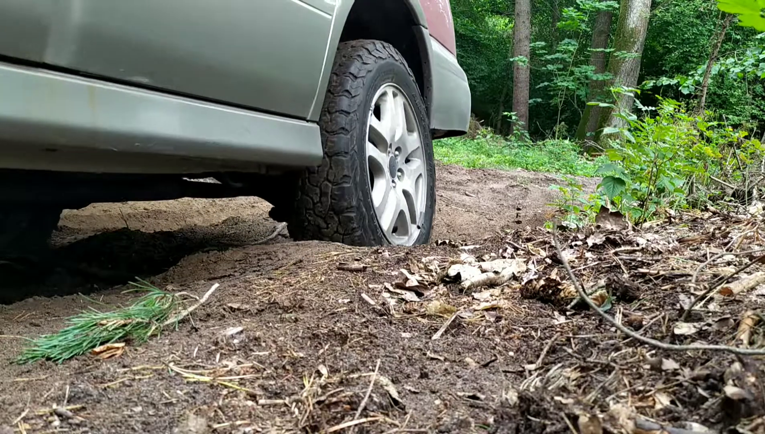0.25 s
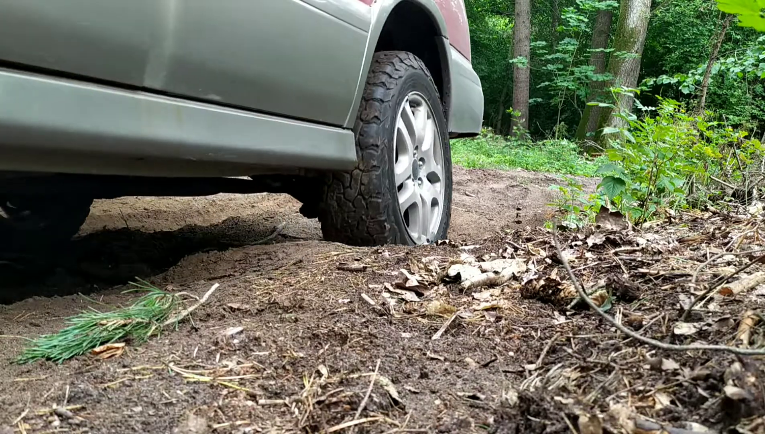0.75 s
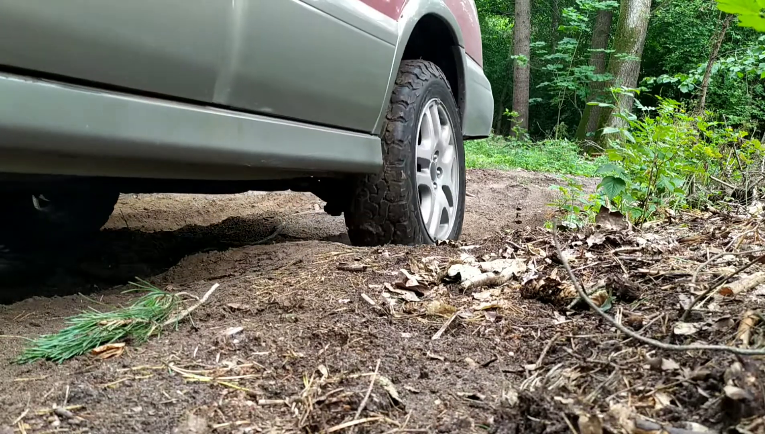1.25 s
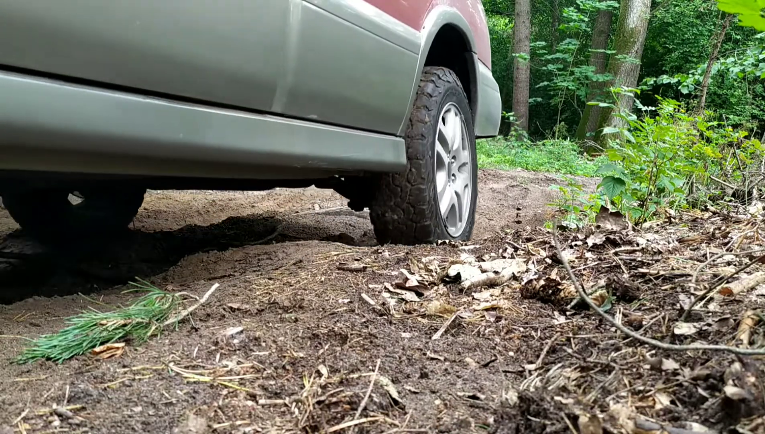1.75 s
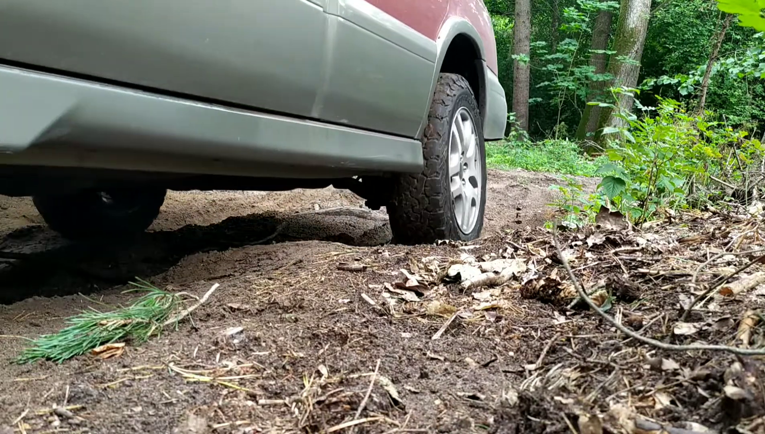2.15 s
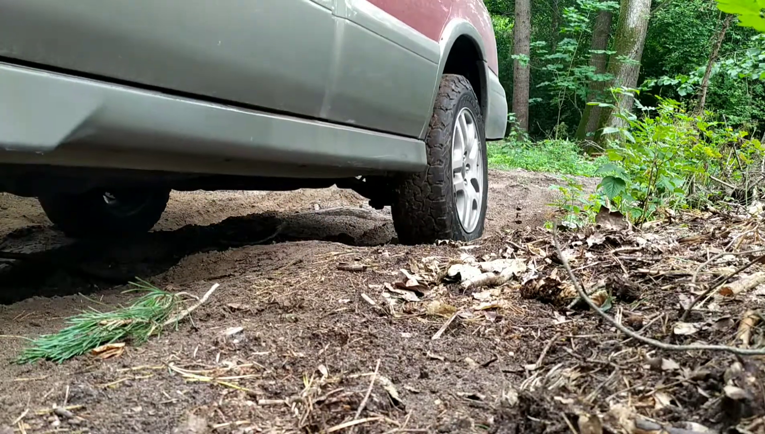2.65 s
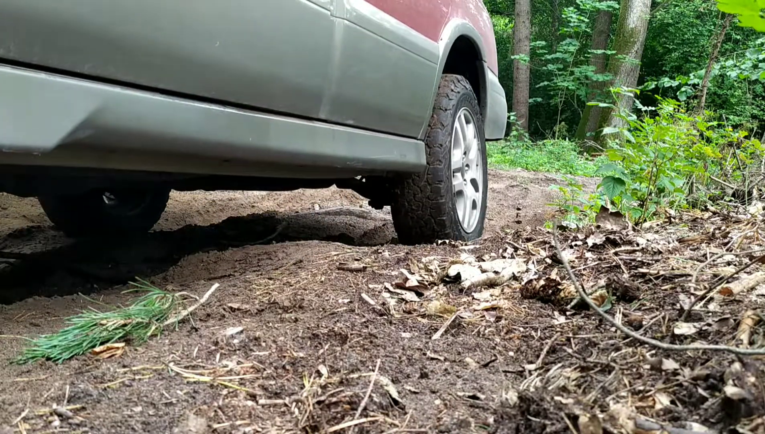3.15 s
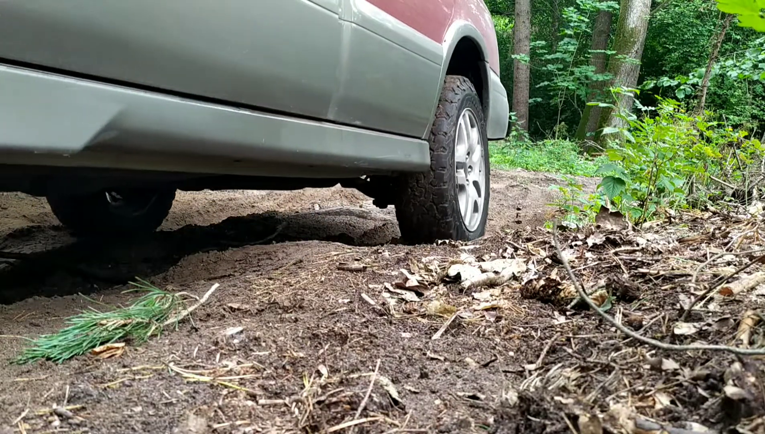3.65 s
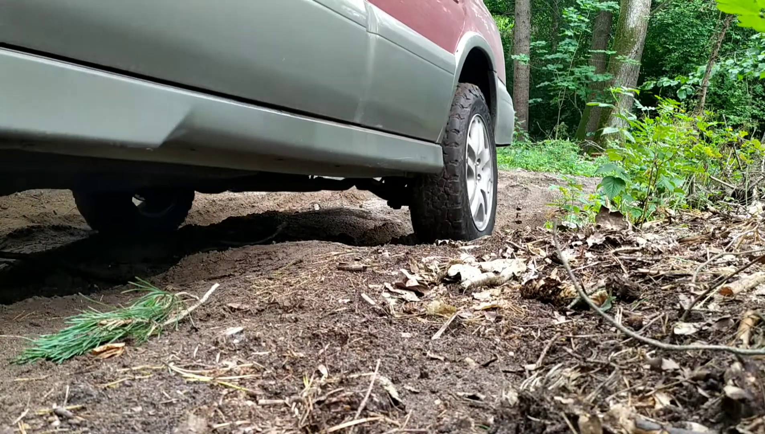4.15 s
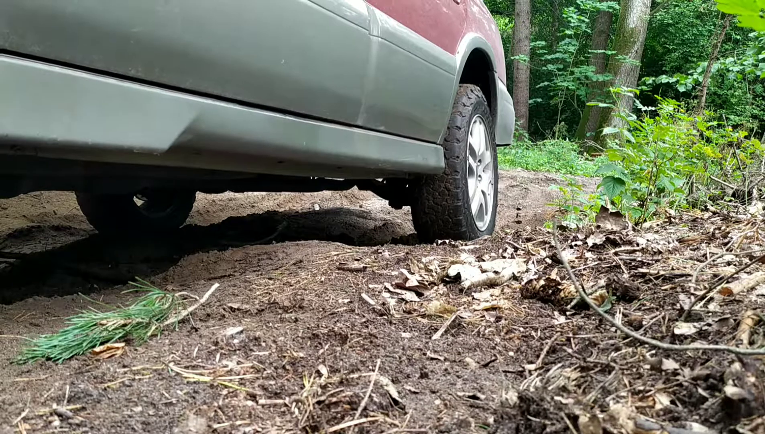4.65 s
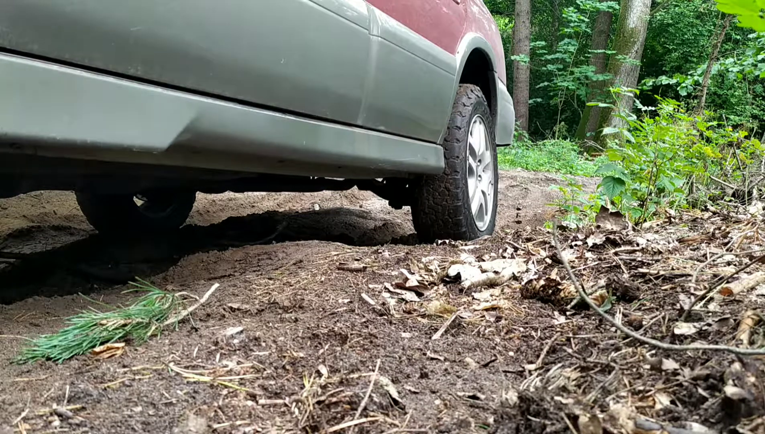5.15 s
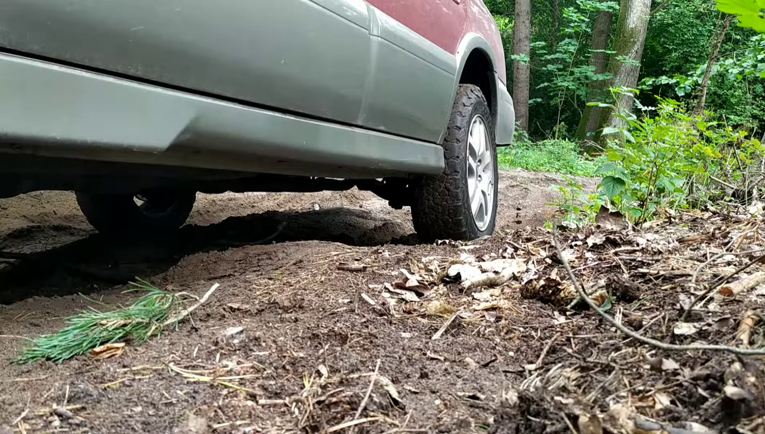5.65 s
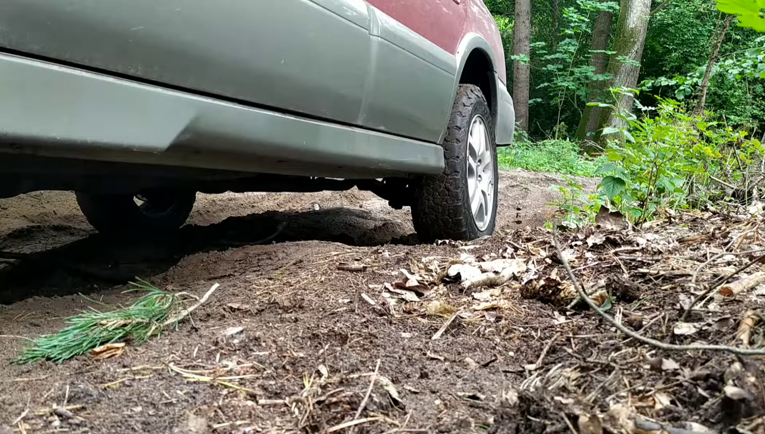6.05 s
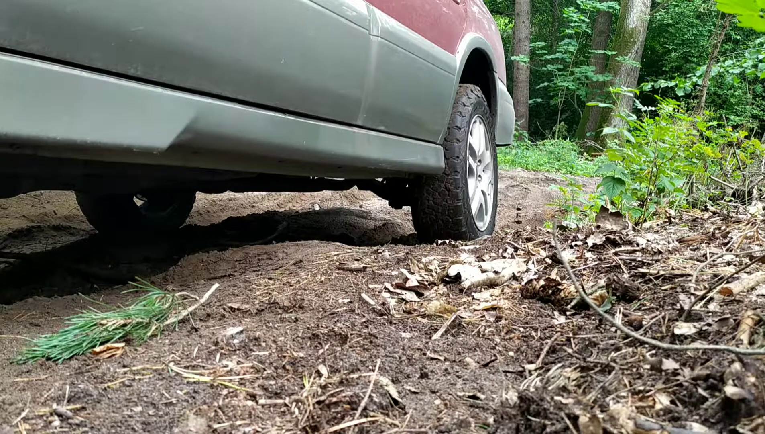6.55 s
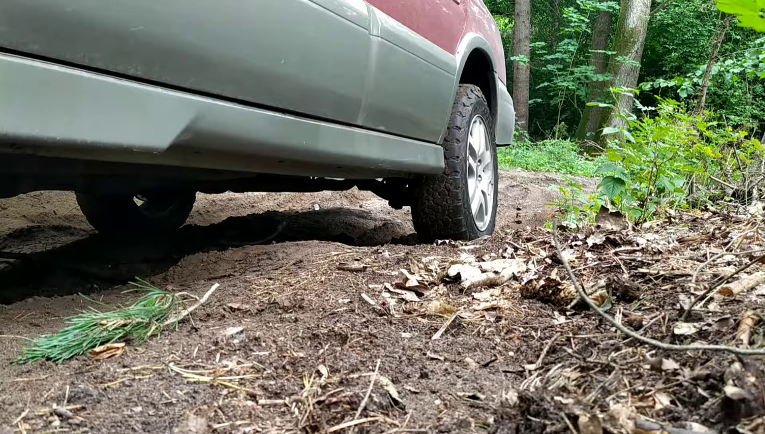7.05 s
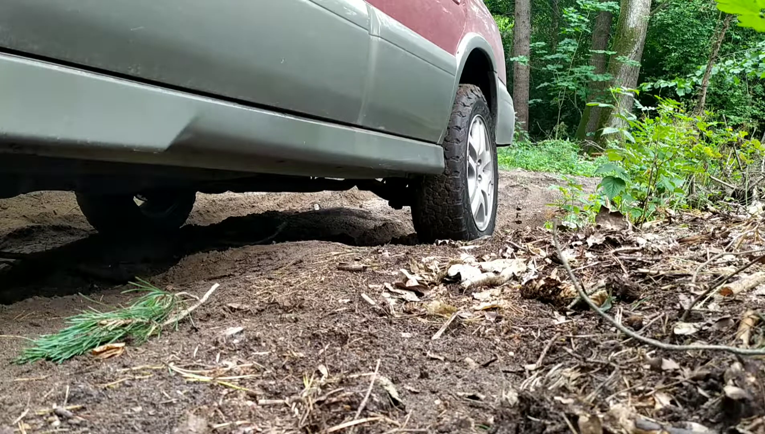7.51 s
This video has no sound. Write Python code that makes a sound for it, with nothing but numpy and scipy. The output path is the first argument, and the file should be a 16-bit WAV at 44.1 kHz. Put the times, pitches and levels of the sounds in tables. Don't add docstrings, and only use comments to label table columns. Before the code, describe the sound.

Low, boomy car engine labouring at ground level, sinking to a lumpy chug then picking up, with ticking valves and cracking twigs under tyres.

```python
import sys
import numpy as np
from scipy import signal
from scipy.fft import rfft, irfft, next_fast_len
from scipy.io import wavfile
from scipy.ndimage import uniform_filter1d, map_coordinates

SR = 44100
rng = np.random.default_rng(int(sys.argv[2]) if len(sys.argv) > 2 else 0)


def store_wav(level_fs):
    pcm = np.round(np.clip(np.atleast_2d(level_fs), -1, 1) * 32767)
    wavfile.write(sys.argv[1], SR, pcm.T.astype(np.int16))


def ratio_of_db(decibels):
    return 10 ** (np.asarray(decibels, float) / 20)


N = 343098


def unit(x):
    return x / np.sqrt(np.mean(x ** 2) + 1e-20)


def along(points, hz):
    f, v = np.transpose(points)
    return np.interp(np.log(hz + 1), np.log(f + 1), v)


def curves(rows):
    s, *cols = np.transpose(rows)
    return [np.interp(np.arange(N) / SR, s, c) for c in cols]


def wobble(rate_hz):
    coarse = np.arange(0, N + 64, 64)
    knots = rng.standard_normal(int(N * rate_hz / SR) + 4)
    return np.interp(np.arange(N), coarse, map_coordinates(knots, [coarse * rate_hz / SR]))


def filtered(x, response):
    m = next_fast_len(N + SR)
    return irfft(rfft(x, m) * response(np.fft.rfftfreq(m, 1 / SR) + 1e-3), m)[..., :N]


def mode(f, centre_hz, width_hz):
    return 1j * f * width_hz / (centre_hz ** 2 - f ** 2 + 1j * f * width_hz)


def strikes(times_s, sizes):
    at = np.round(times_s * SR).astype(int)
    keep = (at >= 0) & (at < N)
    return np.bincount(at[keep], (sizes + 0 * times_s)[keep], N)


# hz, correlation
LIKENESS = [(60, 1), (250, 0.95), (500, 0.98), (1000, 0.82), (1600, 0.73), (2200, 0.55), (3200, 0.56),
            (5000, 0.45), (8000, 0.1), (12000, 0.15)]


def rush(spectrum, patchy_db):
    z = signal.stft(rng.standard_normal((2, N)), nperseg=512)[2]
    field = uniform_filter1d(rng.standard_normal(z.shape[1:]), size=6, axis=0)
    field = uniform_filter1d(field, size=12, axis=1)
    pair = signal.istft(z * ratio_of_db(patchy_db * unit(field)), nperseg=512)[1][:, :N]

    def mid_side(hz):
        angle = np.arccos(np.clip(along(LIKENESS, hz), -1, 1)) / 2
        return ratio_of_db(along(spectrum, hz)) * [np.cos(angle), np.sin(angle)]

    mid, side = filtered(pair, mid_side)
    return unit(np.array([mid + side, mid - side]))


# hz, level_db
AIRFLOW = [(45, -60), (65, -3), (135, -5), (210, -3.5), (260, -11.5), (400, -8), (550, -11), (750, -19),
           (1100, -18), (1600, -43), (4000, -90)]
WHIRR = [(500, -46), (1000, -3.5), (1400, -5.5), (2100, -1.5), (2800, -4.5), (3600, -6), (4500, -13),
         (7000, -67)]
HISS = [(2000, -49), (4000, -3), (5500, -0.5), (7000, -1.5), (9000, 0.5), (11000, -2), (13000, -4.5),
        (15500, -5.5), (17000, -30)]


def engine_bay():
    PULL_S, PULL_RISE_S = 3.19, .08
    pull = .5 + .5 * np.tanh((np.arange(N) / SR - PULL_S) / PULL_RISE_S)
    air_db = -45.5 + 2 * pull + 4.0 + 1.14 * wobble(11)
    whirr_db = -56.5 + 2.5 * pull + 4 + 0.61 * wobble(15)
    hiss_db = -55 + 1.64 * pull + 3.5 + 0.21 * wobble(7.9)
    air = ratio_of_db(air_db) * rush(AIRFLOW, patchy_db=1.5)
    whirr = ratio_of_db(whirr_db) * rush(WHIRR, patchy_db=1.5)
    hiss = ratio_of_db(hiss_db) * rush(HISS, patchy_db=2.0)
    return air + whirr + hiss


# time_s, turns_per_s
FAN_SPEED = [(0, 37.9), (1, 37.9), (2, 37.7), (2.35, 37.15), (3.1, 37.2), (3.6, 37.8), (5.5, 37.8),
             (7.78, 37.85)]
# multiple_of_fan_speed, level_db
BLADE_HUM = [(4, -42), (5, -48), (6, -55), (8, -55.5), (9, -60.5), (10, -56.5), (12, -57), (14, -60.5),
             (15, -58.5), (18, -59.5)]


def fan():
    turn_rad = 2 * np.pi * np.cumsum(curves(FAN_SPEED)[0]) / SR

    def hum(k, db):
        level = ratio_of_db(db + 3 + wobble(4))
        return level * np.sin(k * turn_rad + .15 * wobble(3) + 2 * np.pi * rng.random())

    return sum(hum(round(k), db) for k, db in BLADE_HUM)


# time_s, speed_rpm
REVS = [(0, 785.4), (.6, 775.2), (1.2, 743.7), (1.5, 659.9), (1.9, 611.7), (2.95, 614.1), (3.15, 683.7),
        (3.4, 798.6), (3.9, 796.9), (4.6, 806), (5.6, 779.2), (6.7, 771.5), (7.1, 741), (7.78, 644.6)]


def crank():
    START_CYCLE = -.202
    t = np.arange(-200, 8000) / 1000
    done = np.cumsum(np.interp(t, *np.transpose(REVS))) / 120 / 1000
    return t, done - np.interp(0, t, done) + START_CYCLE


def moments(share):
    t, done = crank()
    return np.interp(np.arange(-1, int(done[-1])) + share, done, t)


# manifold_delay_s, pulse_db, tick_cycle_share, tick_db
CYLINDERS = [(-.0164, 0, .165, -3), (-.014, -3.5, .38, -3), (-.0206, -.2, .625, 0), (-.028, -1.4, .84, 0)]
# hz, level_db
TICK = [(1500, -52), (3500, 6), (4500, 12), (6000, 3), (9000, 11.5), (12000, 3), (16000, -69)]


def valves():
    hits = sum(strikes(moments(share), ratio_of_db(db)) for _, _, share, db in CYLINDERS)
    hits = hits * ratio_of_db(1.5 * rng.standard_normal(N))
    t = np.arange(-400, 1600) / SR
    shape = np.where(t < 0, ratio_of_db(20 * t / 0.044), ratio_of_db(-60 * t / 0.14))
    envelope = signal.fftconvolve(hits, shape)[400:N + 400]
    return ratio_of_db(-52) * envelope * rush(TICK, patchy_db=2)


# hz, level_db
COLOURS = [
    [(5000, -33), (6500, 7), (9000, 6), (11000, 4), (16000, -9.5)],
    [(2500, -5), (3500, -0.5), (5500, 2), (7000, -17)],
    [(550, -9), (800, 7.5), (1500, 1.5), (2100, -0.5), (2900, -2), (3800, -31)],
]
# centre_hz, width_hz, level_db
SHELL = [(171, 83, 5), (229, 27, 3), (277, 17, 2.5), (419, 120, -6), (463, 73, -7), (656, 20, -20.5)]


def shaken(levels):
    def body(f):
        return sum((-1) ** k * ratio_of_db(db) * mode(f, c, w) for k, (c, w, db) in enumerate(SHELL))

    thud = filtered(levels[3] * rng.standard_normal(N), body) * ratio_of_db(18.5)
    return sum(level * rush(colour, patchy_db=3.5) for level, colour in zip(levels, COLOURS)) + thud


# start_s, length_s, level_db, jolt_over_creak_db
CREAKS = [
    (2.418, 0.077, -47, 13),
    (3.36, 0.11, -47.5, 2),
    (3.45, .084, -53, 10),
    (4.213, 0.024, -52.5, 16),
    (4.323, 0.048, -45.5, 12.5),
    (4.363, 0.066, -49.5, 12),
    (7.489, 0.066, -56.5, 6),
]
# bright_db, mid_db, dull_db
CREAK_DB = [-2.5, -1.5, 4]
# centre_hz, width_hz, level_db
SPRING = (3520, 260, -2)


def suspension():
    t, levels = np.arange(N) / SR, np.zeros((4, N))
    slips = ratio_of_db(3.3 * wobble(120))
    for start_s, length_s, db, jolt_db in CREAKS:
        swell = np.sin(np.pi * np.clip((t - start_s) / length_s, 0, 1)) ** 0.6
        levels += ratio_of_db(db + np.array([*CREAK_DB, jolt_db]))[:, None] * swell * slips
    centre_hz, width_hz, spring_db = SPRING
    ring = unit(filtered(rng.standard_normal(N), lambda f: mode(f, centre_hz, width_hz) ** 2))
    return shaken(levels) + ratio_of_db(spring_db) * levels[1] * ring


# time_s, crack_db, thickness_0_to_2, jolt_over_crack_db
SNAPS = [(.088, -36, .2, 7), (0.737, -35.5, 0, 5), (0.7884, -25, 0.36, -8), (.8854, -36, .5, 1),
         (.9204, -35, 0.53, -15), (0.933, -23, 0.23, -11), (0.9794, -18, 0.76, 5.5),
         (0.9955, -41.5, 1.96, -3), (1.0114, -43, 1.2, 16), (1.3119, -36, .5, 8), (3.583, -35.5, .2, -11),
         (4.38, -33.5, 1.66, -17), (4.3924, -46, 0.94, 13), (4.4794, -37, 0.57, 4), (7.4282, -39, 0.61, -4),
         (7.5153, -37, 0.052, -2), (7.722, -31, .9, -1)]


def twigs():
    SNAP_RISE_S, SNAP_T60_S = 0.0019, 0.054
    t, levels = np.arange(N) / SR, np.zeros((4, N))
    for start_s, crack_db, thick, jolt_db in SNAPS:
        age_s = np.clip(t - start_s, 0, None)
        decay = (1 - np.exp(-age_s / SNAP_RISE_S)) * ratio_of_db(-60 * age_s / SNAP_T60_S)
        colour_db = np.array([0, -9 + 8 * thick, -17 + 16 * thick, jolt_db - 1.5])
        levels += ratio_of_db(crack_db - 3.5 + colour_db)[:, None] * decay
    return shaken(levels)


# time_s, exhaust_db
EFFORT = [(0, -27.5), (.7, -29.5), (1.3, -30.5), (1.9, -34.5), (2.9, -34.5), (3.35, -27), (3.8, -29.5),
          (6.5, -32), (7.2, -33), (7.78, -38)]


def load():
    LABOUR_RPM, BLEND_RPM, REMAINS_DB = 705, 12, -21
    UPPER_DB, UPPER_DB_PER_RPM, IDLE_RPM = -35.5, 0.0962, 785
    rpm, effort = curves(REVS)[0], ratio_of_db(curves(EFFORT)[0])
    pulling = 1 / (1 + np.exp((LABOUR_RPM - rpm) / BLEND_RPM))
    upper = ratio_of_db(UPPER_DB + UPPER_DB_PER_RPM * (rpm - IDLE_RPM))
    return effort * (pulling + ratio_of_db(REMAINS_DB)), upper, effort * (1 - pulling + ratio_of_db(REMAINS_DB))


def cut(f, corner_hz):
    return (-f * f / (corner_hz ** 2 - f * f + 1.2j * f * corner_hz)) ** 2


# centre_hz, width_hz, level_db
PIPE = [(52.6, 4, -2.3), (88.55, 4.2, -1.2), (129, 4, -3.5)]
# centre_hz, width_hz
SILENCER = (75.4, 20)


def burble(order):
    CYCLE_HZ = 6.55
    f, (centre, width) = order * CYCLE_HZ, SILENCER
    firings = sum(ratio_of_db(db) * np.exp(-2j * np.pi * (order * k / 4 + f * delay_s))
                  for k, (delay_s, db, *_) in enumerate(CYLINDERS))
    chamber = mode(f, centre, width) * (centre / (1j * f) * mode(f, centre, width) - .4)
    pipe = sum(ratio_of_db(db) * mode(f, c, w) for c, w, db in PIPE)
    return np.angle(-firings * cut(f, 44.85) * (chamber + pipe))


DRONE = [-62, -40, -46, -38, -36, -35, -41, -52, -40, -51, -52]
UPPER = [-47, -39, -39, -50, -60, -53, -55]
LOPE = [0, -2.5, -11, -13]
# centre_hz, width_hz, level_db
CHUFF = [(67.4, 10, 9.5), (93.3, 43, -4)]


def exhaust():
    drone, upper, single = load()
    turn_rad = 2 * np.pi * np.interp(np.arange(N) / SR, *crank())

    def stack(first, levels_db):
        return unit(sum(ratio_of_db(db + .4 * wobble(5)) * np.cos(k * turn_rad + burble(k))
                        for k, db in enumerate(levels_db, first)))

    def chuff_ring(f):
        rings = sum((-1) ** k * ratio_of_db(db) * mode(f, c, w) for k, (c, w, db) in enumerate(CHUFF))
        return cut(f, corner_hz=53.3) * mode(f, 91, 53) * rings

    pulses = sum(strikes(moments(k / 4) - .026, ratio_of_db(db)) for k, db in enumerate(LOPE))
    pulses *= ratio_of_db(.8 * rng.standard_normal(N))
    chuff = unit(filtered(pulses, chuff_ring))
    boom = drone * stack(7, DRONE) + upper * stack(18, UPPER) + single * chuff
    return filtered(boom, lambda f: 1 / (1 + (46 / f) ** 12))


# hz, left_minus_right_db
PAN = [(60, 1), (150, .6), (300, -.4), (600, .9), (1500, -1.3), (6000, -2), (14000, -.8)]


def scene():
    air = engine_bay() + fan() + valves() + suspension() + twigs() + exhaust()
    return filtered(air, lambda hz: ratio_of_db(np.outer([.5, -.5], along(PAN, hz))))


def low_pass(x):
    return signal.sosfilt(signal.butter(12, 15940, fs=SR, output="sos"), x)


def record(dry):
    TOP_HZ, LAG_S = 15900, 21 / SR
    dry = filtered(dry, lambda hz: hz < TOP_HZ)
    late = filtered(dry[0], lambda hz: np.exp(-2j * np.pi * hz * LAG_S))
    return low_pass(np.array([late, dry[1]]))


dry = scene()
out = record(dry)
store_wav(out)
```